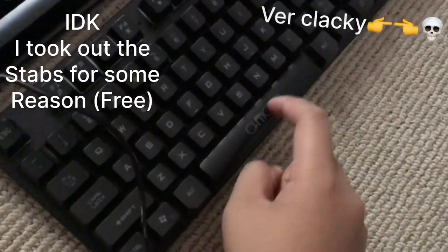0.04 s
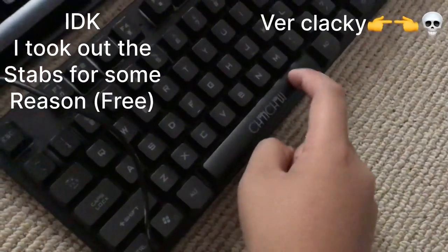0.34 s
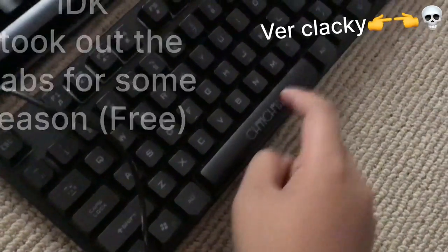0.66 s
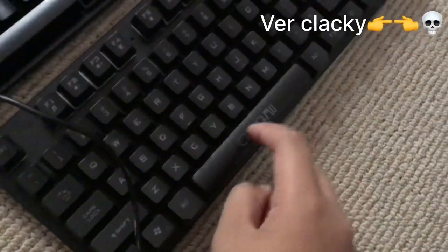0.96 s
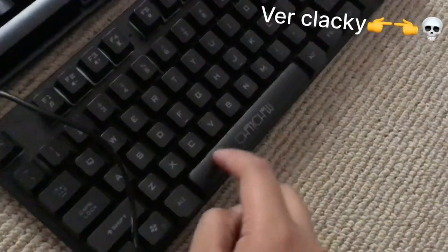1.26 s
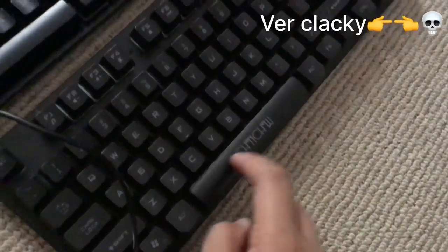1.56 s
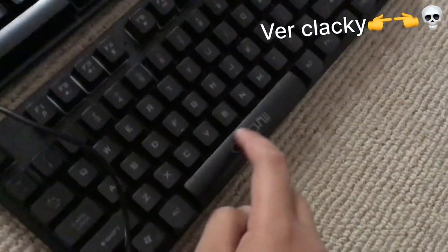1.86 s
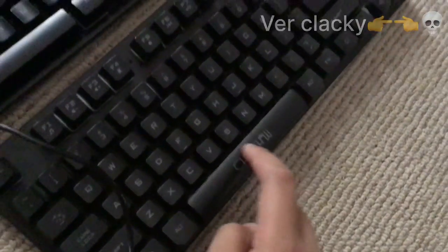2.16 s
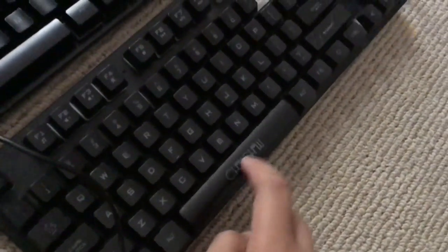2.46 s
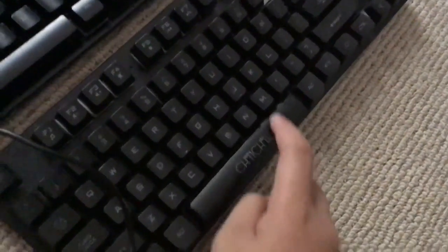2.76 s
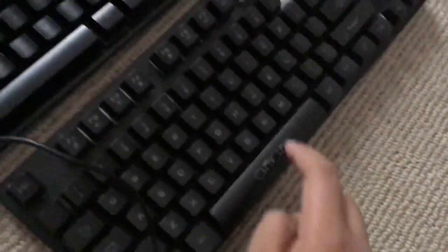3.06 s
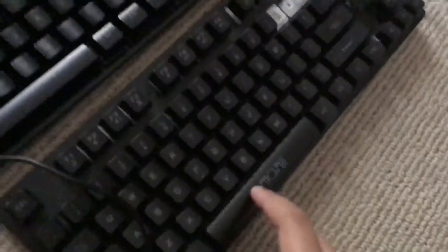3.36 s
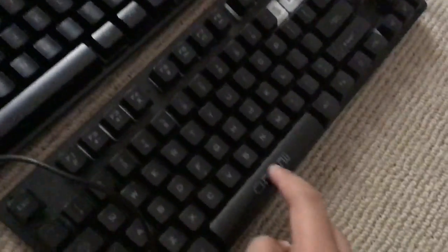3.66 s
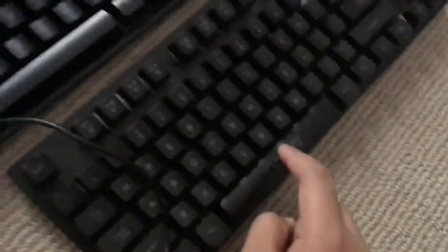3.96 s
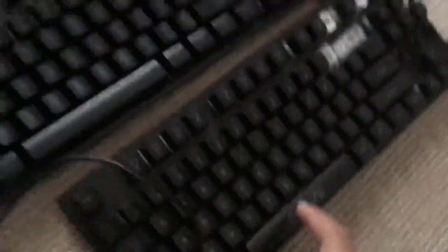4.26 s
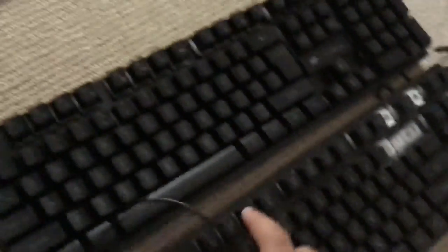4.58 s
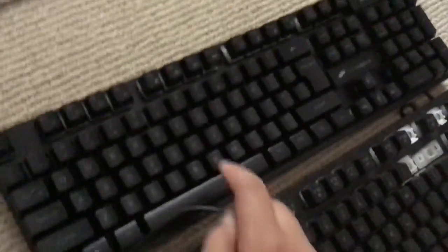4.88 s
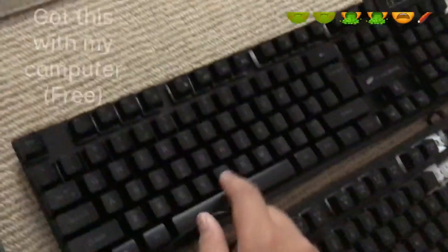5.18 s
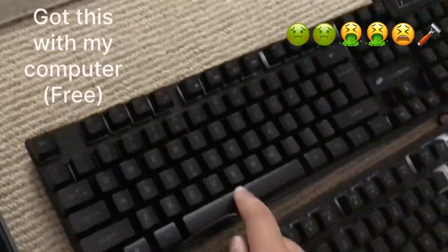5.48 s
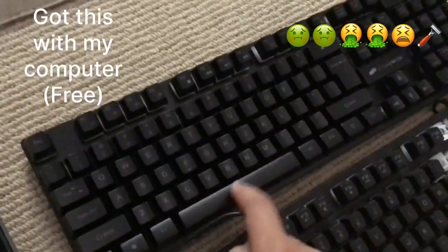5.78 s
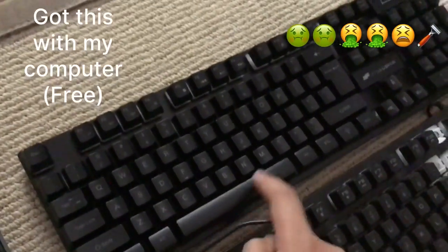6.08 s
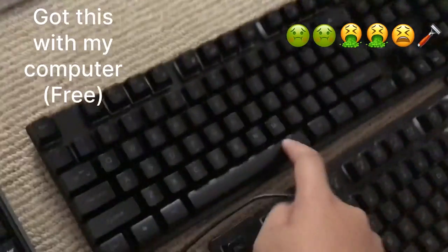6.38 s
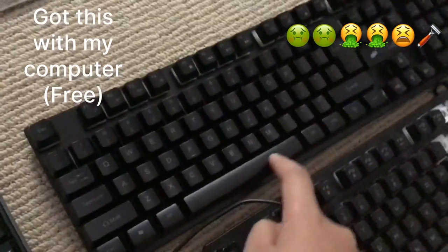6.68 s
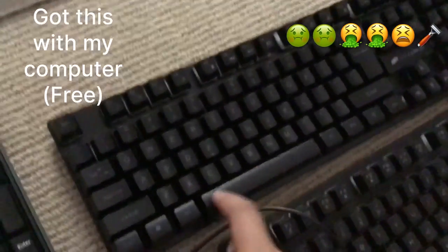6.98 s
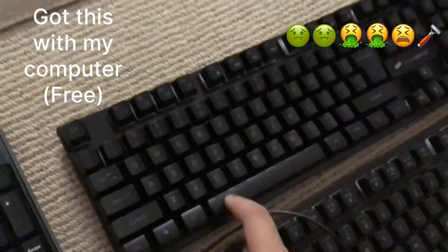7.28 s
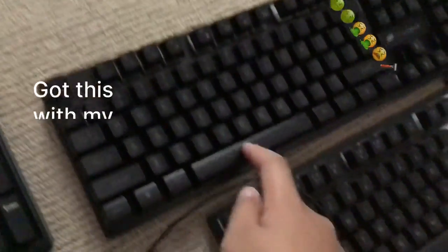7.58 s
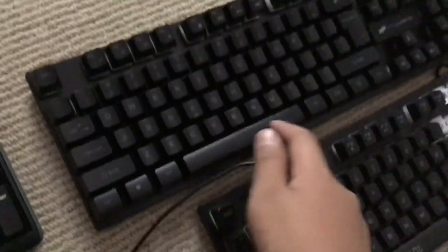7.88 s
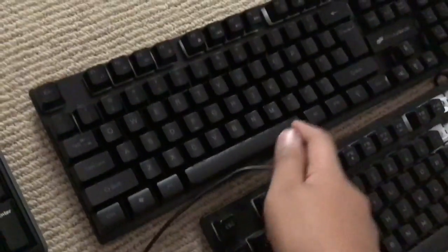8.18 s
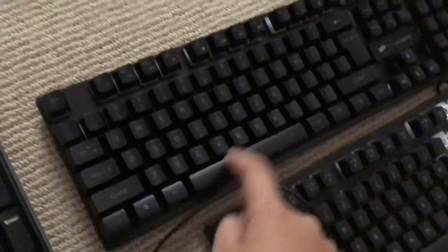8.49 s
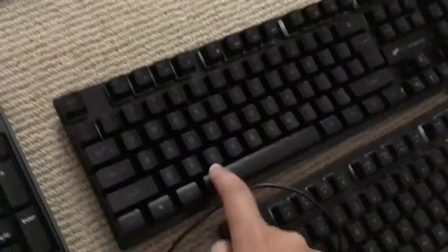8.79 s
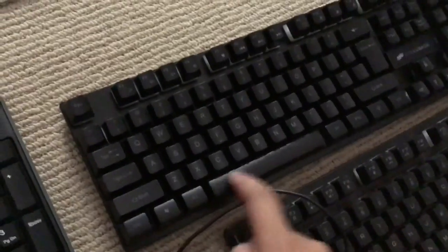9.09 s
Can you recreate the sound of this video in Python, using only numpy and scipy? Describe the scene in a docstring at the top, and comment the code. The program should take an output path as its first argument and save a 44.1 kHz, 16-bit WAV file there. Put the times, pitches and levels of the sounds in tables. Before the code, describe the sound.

From the start, one finger hammers the loose space bar of a plastic computer keyboard, about six presses a second in short, uneven runs. Each press lands with a small thud and snaps back with a hard, sharp clack, with light rattling between. The clacks are loudest around 3 to 3.5 seconds and stop just after 4 seconds. In the pause, a soft sleeve rustle and low handling rumble swell near 4.7 seconds, with a few faint key rattles. From about 5.5 seconds a second keyboard's space bar is tapped at a similar pace until just past 9 seconds. It sounds lighter, brighter and more rattly, with small ticks and, from around 7.3 seconds, a few tiny spring pings. The microphone is close, in a small room that adds a short ring to each hit, and a distant fan drones faintly underneath.

```python
"""Space bars on two keyboards.

One finger hammers the space bars of two plastic keyboards on a carpet, near a phone in a small room.
The first bar has no stabilisers: it bottoms out with a thud and snaps back with a hard clack.
A sleeve rustles over low handling rumble as the arm moves. The second bar is lighter and brighter, with
rattles, stem ticks and spring pings. Contacts ring the plastic and the room; a distant fan drones."""
import sys
import numpy as np
from scipy import signal
from scipy.fft import rfft, irfft, next_fast_len
from scipy.io import wavfile

SR = 44100
rng = np.random.default_rng(int(sys.argv[2]) if len(sys.argv) > 2 else 0)


def generate_wav(signal):
    """Clip the signal to [-1, 1] and save it as 16-bit WAV at the path in sys.argv[1]."""
    frames = np.transpose(np.atleast_2d(signal))
    scaled = np.clip(frames, -1, 1) * 32767
    pcm = np.round(scaled).astype(np.int16)
    wavfile.write(sys.argv[1], SR, pcm)


N = 407484
SECOND_FROM_S = 4.3
LEAD_IN_S = .012  # slide before each impact
BLOW_S = np.arange(SR // 12) / SR  # time axis of one blow
RMS_20MS = np.sqrt(SR / 50)  # unit energy to unit rms over 20 ms

# bar bottoms out: start_s, nominal_chatter_s, level_db, brightness_db
PRESSES = [(0.0918, 0.0197, -39.5, 1.5), (0.2634, 0.004, -45.5, -6), (0.7669, 0.011, -37, 1.5),
           (0.9272, 0.01, -38, 2.5), (1.0955, 0.0032, -43, -3), (1.2377, 0.01, -40.5, -0.5),
           (1.3947, 0.026, -37.5, 2), (1.5551, 0.012, -34, 4.5), (1.6002, 0.005, -49, -11.5),
           (1.8683, 0.0072, -39, 5), (2.0177, 0.01, -41, 0.5), (2.1589, 0.0018, -35, 0.5),
           (2.1699, 0.002, -42.5, 8), (2.4261, 0.0034, -37.5, 0.5), (2.5886, 0.0074, -35.5, 2),
           (2.8565, 0.0056, -34, 7), (2.8662, 0.0032, -36, -6.5), (3.0283, 0.0046, -34, 5.5),
           (3.3538, 0.008, -36, 0), (3.5075, 0.0061, -37.5, -1), (3.7678, 0.007, -36.5, 4),
           (4.0232, 0.0063, -33, 7), (5.7499, 0.0042, -37, -0.5), (5.9082, 0.006, -40, 3),
           (6.0442, 0.005, -40, 1.5), (6.34, 0.003, -33.5, -1.5), (6.4847, 0.004, -35.5, 10.5),
           (6.6511, 0.0025, -39.5, 2.5), (6.9503, 0.003, -33, -4), (7.1034, 0.0025, -37, -2.5),
           (7.246, 0.0026, -40, -2), (7.4076, 0.005, -40.5, -0.5), (7.5563, 0.0045, -40, 2),
           (7.72, 0.0034, -43.5, -0.5), (7.8725, 0.008, -40.5, 5), (8.1537, 0.013, -36.5, 4.5),
           (8.3073, 0.002, -36.5, 2), (8.6229, 0.0016, -38.5, -10.5), (8.7787, 0.0061, -36.5, 0),
           (8.957, 0.0042, -34.5, -3.5), (9.1117, 0.0027, -33.5, -1)]
# bar hits its top stop, brightest when one end leads: start_s, chatter_s, level_db, brightness_db
RELEASES = [(0.0136, 0.0011, -38, 9), (0.174, 0.00017, -28.5, 9), (0.7008, 0.00076, -30.5, 7.5),
            (0.829, 0.012, -43.5, -5.5), (1.0042, 0.0033, -39.5, -7.5), (1.1507, 0.0024, -30.5, 2),
            (1.3153, 0.00098, -28, 0), (1.4775, 0.00021, -29.5, -1.5), (1.7977, 0.0032, -37, 4.5),
            (1.9369, 0.00046, -39.5, -11.5), (2.087, 0.00066, -41.5, -14.5),
            (2.3443, 0.00017, -43.5, -15.5), (2.8007, 0.0008, -32, 12), (2.9355, 0.0006, -28, 6.5),
            (3.279, 0.0009, -26, 0), (3.4406, 0.00096, -25, -1), (3.707, 0.0014, -39, -5),
            (3.7167, 0.0015, -41, -6.5), (3.8338, 0.00117, -35.5, 6), (3.9611, 0.00024, -30.0, 10),
            (3.9763, 0.0032, -33, 0), (5.4564, 0.0022, -41, -11.5), (5.668, 0.0018, -40, -2),
            (5.6811, 0.0045, -42.5, -3), (5.8321, 0.0053, -36, -5), (5.955, 0.0036, -42, 11),
            (6.2785, 0.001, -42.5, 10), (6.3932, 0.00194, -36, 9.5), (6.41, 0.0059, -34.5, 0),
            (6.5332, 0.0014, -38.5, 9.5), (6.5515, 0.0046, -36, 5), (6.8548, 0.0014, -38, -9),
            (6.8665, 0.0019, -39.5, 1), (7.018, 0.005, -40, 2.5), (7.1592, 0.0028, -39, -3),
            (7.3615, 0.0024, -44.5, -13), (7.4655, 0.0045, -43, -10), (7.6338, 0.01, -45.5, -7),
            (7.7674, 0.011, -39.5, 5.5), (8.0777, 0.0065, -37, 9), (8.2048, 0.0024, -37.5, 6.5),
            (8.2229, 0.0007, -37.5, 3), (8.29, 0.0055, -36, -0.5), (8.5281, 0.0015, -40.5, -6),
            (8.637, 0.001, -38.5, -9.5), (8.7087, 0.00065, -43, -11.5), (9.017, 0.0053, -42.5, 1.5),
            (9.175, 0.008, -34, -3.5)]
# loose bar rocks in its guides: start_s, level_db
RATTLES = [(0.0437, -45.5), (0.2948, -58), (0.3915, -55), (0.407, -61.5), (0.5261, -55), (0.573, -56.5),
           (0.637, -55), (0.8524, -47.5), (0.8814, -46.5), (0.9056, -47), (1.1206, -47.5), (1.5276, -53.5),
           (1.679, -56), (1.7114, -58), (1.7721, -44), (1.856, -48), (1.926, -43.5), (2.0812, -48.5),
           (2.1387, -53.5), (2.333, -47), (2.3565, -49.5), (2.397, -51), (2.447, -45), (2.47, -47.5),
           (2.9166, -47.5), (3.2522, -47.5), (3.4075, -54.5), (3.5578, -50.5), (3.665, -54),
           (3.6888, -44.5), (3.741, -50), (3.7932, -49.5), (3.9418, -45), (4.5343, -57), (4.588, -57.5),
           (4.6505, -64), (4.7538, -53), (5.0554, -55.5), (5.195, -63.5), (5.31, -61.5), (5.4398, -55),
           (5.4762, -50.5), (5.543, -60), (5.582, -54), (5.818, -41), (5.9851, -46), (6.0133, -44),
           (6.1726, -47.5), (6.2172, -50), (6.2335, -51.5), (6.3181, -51.5), (6.4495, -46), (6.613, -50),
           (6.8415, -52.5), (6.9424, -42), (7.3195, -45.5), (7.351, -44.5), (7.4881, -44.5),
           (7.5464, -48.5), (7.6735, -43), (7.7106, -45.5), (7.9177, -54), (7.9573, -48), (8.049, -47),
           (8.1203, -46.5), (8.3567, -54.5), (8.4183, -59), (8.547, -45), (8.6114, -42), (8.681, -47.5),
           (8.7358, -44.5), (8.897, -46), (8.9333, -48.5), (9.0717, -42), (9.2039, -45.5)]
# fingertip knocks the bar softly as it lifts, just before the snap back: start_s, level_db
FINGER_LIFTS = [(0.662, -39), (2.7522, -30), (3.258, -27)]
# second bar's stem slips free: start_s, level_db
TICKS = [(5.818, -56), (5.9548, -57), (6.217, -62.5), (6.391, -51), (6.5332, -53), (7.351, -70),
         (7.7503, -60), (7.7677, -55.5), (8.049, -58), (8.2015, -51), (9.2039, -61)]
# second bar's spring unloads: start_s, level_db, pitch_hz
PINGS = [(7.353, -37, 5460), (7.668, -36, 5630), (8.732, -39, 6000), (8.9336, -46, 6420),
         (9.067, -37.5, 5800)]

# limits of the thud, knock, ring, clack, ping and tick bands: edge_hz
BAND_EDGES_HZ = [130, 480, 1100, 2000, 4100, 5600, 16000]
BANDS = [signal.butter(3, edges, "band", fs=SR, output="sos")
         for edges in zip(BAND_EDGES_HZ, BAND_EDGES_HZ[1:])]
# contact spectrum, row per keyboard: thud_db, knock_db, ring_db, clack_db, ping_db, tick_db
PRESS_BALANCE_DB = [(-5, -6, 0.0035, -7, -28.5, -17.5), (-15.5, -5.5, 0, -2, -20.5, -14.5)]
RELEASE_BALANCE_DB = [(-24, -12.5, .5, -3, -25, -16.5), (-22, -17.5, 0, -2.5, -20, -20.5)]
RATTLE_BALANCE_DB = [(-15, -5.5, 0, -5, -17.5, -21), (-21.5, -14.5, 0, -4.5, -18, -21.5)]
# brightness trades body for treble, row per keyboard, column per band: db_per_brightness_db
PRESS_TILT = [(-.5, 0, -0.17, 0.44, 0.15, .5), (0, 0.023, -0.42, 0.27, .4, .5)]
RELEASE_TILT = [(-.3, -0.29, -0.4, 0.11, .15, -0.12), (-0.072, -0.41, -0.36, 0.21, .45, 0.12)]

# bar, plate and case modes: pitch_hz, nominal_t60_s, level_db
FIRST_MODES = [(286, 0.073, -9), (301.6, 0.051, -6), (333.6, 0.06, -7), (336, 0.039, -13),
               (607, 0.03, -7.5), (737, 0.022, -6), (840, 0.016, -14), (1340, 0.025, -8.5),
               (1481, 0.039, -1.5), (1595, 0.031, 1), (2140, 0.0069, -8.5), (2468, 0.065, -12.5),
               (3160, .02, -3.5), (3300, 0.045, -11), (3690, 0.013, -4.5), (4623, 0.017, -11),
               (6020, 0.023, -13.5), (6930, 0.014, -14), (7960, 0.012, -13), (15500, 0.0091, -19)]
SECOND_MODES = [(247.5, 0.12, -18.5), (387, 0.045, -19), (562, 0.06, -17), (667, 0.021, -8),
                (740, .028, -13), (890, 0.019, -26.5), (1413, 0.038, -9.5), (1512, 0.031, -5.5),
                (1621, 0.034, -6.5), (1820, 0.014, -6), (2335, 0.0048, -2.5), (2486, 0.036, -8.5),
                (3252, 0.02, -4), (3554, 0.016, -5), (4680, 0.036, -20), (6240, 0.025, -17),
                (8280, 0.0086, -21.5), (10090, 0.03, -21), (11440, 0.015, -21), (11900, 0.014, -36),
                (15040, 0.0043, -8.5)]
# spectrum of the dense weak modes between them: freq_hz, level_db
FIRST_PLASTIC = [(100, -23.5), (300, -6), (480, -17), (700, -16.5), (1000, -3), (1500, -7), (2100, -1.5),
                 (3400, -3.5), (4200, -10.5), (5000, -2), (5800, -18), (8500, -19), (12500, -24.5),
                 (16000, -39.5)]
SECOND_PLASTIC = [(100, -15.5), (300, -8.5), (700, -1), (1000, -1), (1500, -17), (2100, 3.5), (3400, 3),
                  (4200, -10.5), (5000, -23.5), (5800, -10), (8500, -21), (16000, -27)]
# first bar's own modes, struck one end first: pitch_hz, t60_s, level_db
ASKEW_MODES = [(3103, 0.032, -13), (3312, 0.022, 1.5), (4530, 0.026, -.5), (4690, .016, -5)]

# diffuse room tail, row per band: t60_s, level_db
ROOM_TAILS = [(0.53, -2), (0.43, -6.5), (0.4, -4), (0.39, -4.5), (0.42, -11), (0.37, -6)]
# diffuse field spectrum: freq_hz, level_db
ROOM_COLOUR = [(130, -5), (290, 5.5), (460, -6), (660, 2.5), (1080, -3), (1560, 13.5), (1900, -7.5),
               (2800, -7), (3350, 0), (4100, -14.5), (4600, -4), (5600, -18), (8000, -19.5), (16000, -40)]
# standing waves between the walls: pitch_hz, t60_s, level_db
ROOM_MODES = [(135, 1, -16.5), (166, 0.94, -12), (238.5, 0.8, -9)]
# envelope of sleeve rustle and handling rumble: time_s, level_db
HANDLING_SWELL = [(4.3, -101), (4.45, -67), (4.6, -64), (4.71, -58.5), (4.78, -65), (4.95, -72.5),
                  (5.15, -75)]
# sleeve rustle with low rumble from handling the phone: freq_hz, level_db
HANDLING_COLOUR = [(40, -5), (75, 21), (150, 12), (480, 13.5), (900, 5.5), (3300, 2.5), (6500, -7),
                   (9000, -13), (12500, -25), (14500, -15), (16000, -32)]
# room air spectrum: freq_hz, level_db
AIR_COLOUR = [(15, -33), (25, -18.5), (70, 10.5), (195, -0.5), (242, -0.5), (293, -6.5), (427, -17.5),
              (607, -6.5), (775, -25), (1650, -14.5), (2350, -25.5), (3340, -21), (4250, -29), (14400, -40),
              (16000, -45)]


def strokes(events, balance_db, tilt, gain_db, chatter_scale, slides_db, hard_above_db=-35, hardening=.2):
    """The bar hits a stop; hard hits tick more. slides_db: stem scrape per keyboard."""
    out = np.zeros((len(BANDS), N))
    for start_s, chatter_s, level_db, brightness_db in events:
        board = keyboard_at(start_s)
        bands_db = level_db + np.array(balance_db[board]) + brightness_db * np.array(tilt[board])
        bands_db[-1] += hardening * max(level_db - hard_above_db, 0)
        strike(out, start_s, chatter_s * chatter_scale, slides_db[board], bands_db)
    return out * undb(gain_db)


def strike(track, start_s, chatter_s, slide_db, bands_db, impact_db=4, impact_lag_s=.0004,
           thud_lag_s=0.00414):
    """Mix in one blow, row per band. Less chatter: a cleaner impact, a purer and shorter ring."""
    clean = np.exp(-chatter_s / 0.0015)
    force = contact(chatter_s, slide_db)
    force[int((LEAD_IN_S + impact_lag_s) * SR)] += undb(impact_db) * clean
    boards = [(FIRST_MODES, FIRST_PLASTIC, -4.5), (SECOND_MODES, SECOND_PLASTIC, -1.0)]
    modes, plastic, dense_db = boards[keyboard_at(start_s)]
    ring = body(modes, plastic, damping=1 + 0.41 * clean, dense_db=dense_db - 7 * clean)
    sound = signal.fftconvolve(force, ring)[:len(BLOW_S)]
    parts = np.array([unit(signal.sosfilt(band, sound)) * undb(db) for band, db in zip(BANDS, bands_db)])
    # the heavy case sinks into the carpet just after the bar lands
    parts[0] = np.interp(BLOW_S - thud_lag_s, BLOW_S, parts[0], left=0)
    add(track, start_s - LEAD_IN_S, parts * RMS_20MS)


def contact(chatter_s, slide_db, grain_db=5, rise_s=0.00022, bounce_db=-12, bounce_s=0.017,
            loose_s=0.0029, slide_s=0.0074):
    """The stem scrapes, lands in uneven micro-impacts, and the loose bar bounces to rest."""
    size = len(BLOW_S)
    t = BLOW_S - LEAD_IN_S
    after_s = np.maximum(t, 0)
    grains = undb(grain_db * np.repeat(rng.standard_normal(size), SR // 4000)[:size])
    landing = unit(grains * rise(after_s, rise_s) * np.exp(-after_s / max(chatter_s, rise_s)))
    slide = unit(grains * (t < 0) * np.exp(np.minimum(t, 0) / slide_s))
    hops = np.repeat(rng.exponential(size=size), SR // 1000)[:size]
    bounces = unit(hops * (t > bounce_s / 2) * np.exp(-after_s / bounce_s))
    looseness = min(chatter_s / loose_s, 1)
    envelope = landing + undb(slide_db) * slide + undb(bounce_db) * looseness * bounces
    return rng.standard_normal(size) * envelope


def body(modes, plastic, damping, dense_db, dense_t60_s=0.018, spread_db=0.5, detune=0.0073):
    """The keyboard rings; finger position varies each mode's weight and pitch a little."""
    t = BLOW_S[:len(BLOW_S) // 2]
    pitch_hz, t60_s, level_db = np.transpose(modes)
    weight, shift, sign = rng.standard_normal((len(modes), 3)).T
    gains = np.sign(sign) * undb(level_db + spread_db * weight)
    detuned_hz = pitch_hz * (1 + detune * shift)
    rings = np.sin(2 * np.pi * np.outer(detuned_hz, t)) * decay(t, t60_s[:, None] / damping)
    dense = noise(plastic, len(t)) * decay(t, dense_t60_s)
    return unit(gains @ rings) + undb(dense_db) * unit(dense)


def askew_ring(gain_db=-3, db_per_brightness_db=1.5, rise_s=0.00045, detune=.008):
    """The more one end of the first bar leads on release, the harder its own modes ring."""
    out = np.zeros((len(BANDS), N))
    for start_s, _, level_db, brightness_db in RELEASES:
        if keyboard_at(start_s) == 0:
            for pitch_hz, t60_s, mode_db in ASKEW_MODES:
                envelope = rise(BLOW_S, rise_s) * decay(BLOW_S, t60_s)
                detuned_hz = pitch_hz * (1 + detune * rng.standard_normal())
                ring = envelope * np.sin(2 * np.pi * (detuned_hz * BLOW_S + rng.random()))
                gain = undb(level_db + mode_db + db_per_brightness_db * brightness_db)
                row = np.searchsorted(BAND_EDGES_HZ, pitch_hz) - 1
                add(out[row], start_s, gain * ring)
    return out * undb(gain_db)


def rattles(chatter_s=0.0038, slide_db=-20, firm_db=-46, dulling=.4):
    """Light contacts that hardly move the case; lighter ones tick less."""
    out = np.zeros((len(BANDS), N))
    for start_s, level_db in RATTLES:
        bands_db = level_db + np.array(RATTLE_BALANCE_DB[keyboard_at(start_s)])
        bands_db[-1] += dulling * (level_db - firm_db)
        strike(out, start_s, chatter_s, slide_db, bands_db)
    return out


def wobbles(count=3, gain_db=-18, spread_db=0.5, delay_range_s=(0.015, .09), chatter_s=0.0013,
            slide_db=-25):
    """The bar rocks in its guides after each press, in proportion to the blow."""
    out = np.zeros((len(BANDS), N))
    for press_s, _, press_db, _ in np.repeat(PRESSES, count, axis=0):
        level_db = press_db + gain_db + spread_db * rng.standard_normal()
        bands_db = level_db + np.array(RATTLE_BALANCE_DB[keyboard_at(press_s)])
        strike(out, press_s + rng.uniform(*delay_range_s), chatter_s, slide_db, bands_db)
    return out


def finger_lifts(pitch_hz=633, t60_s=0.06, rise_s=.004, chatter_s=0.0058, slide_db=-25,
                 contact_db=(-20, -25, -23, -21, -35, -31)):
    """The lifting fingertip softly knocks the hollow bar's lowest mode, with faint contact noise."""
    out = np.zeros((len(BANDS), N))
    knock = np.sin(2 * np.pi * pitch_hz * BLOW_S) * rise(BLOW_S, rise_s) * decay(BLOW_S, t60_s)
    for start_s, level_db in FINGER_LIFTS:
        strike(out, start_s, chatter_s, slide_db, level_db + np.array(contact_db))
        add(out[1], start_s, undb(level_db) * knock)
    return out


def stem_ticks(t60_s=0.022, rise_s=0.00044,
               colour=((4000, -20), (6000, -2), (8500, -3), (12000, -2), (15000, 0), (16000, -4))):
    """The stem catches and slips free: a short burst in the top band."""
    out = np.zeros((len(BANDS), N))
    envelope = rise(BLOW_S, rise_s) * decay(BLOW_S, t60_s)
    for start_s, level_db in TICKS:
        tick = signal.sosfilt(BANDS[-1], noise(colour, len(BLOW_S)) * envelope)
        add(out[-1], start_s, undb(level_db) * unit(tick) * RMS_20MS)
    return out


def spring_pings(gain_db=-3, t60_s=0.02, chatter_s=0.0014):
    """The coil slips on its seat and rings briefly."""
    out = np.zeros(N)
    for start_s, level_db, pitch_hz in PINGS:
        coil = np.sin(2 * np.pi * pitch_hz * BLOW_S) * decay(BLOW_S, t60_s)
        ping = signal.fftconvolve(contact(chatter_s, slide_db=-19), coil)
        add(out, start_s - LEAD_IN_S, undb(level_db + gain_db) * ping / np.abs(ping).max())
    return out


def room(sources, first_s=0.0024, build_s=0.00066, early_db=6, early_s=0.0086, wet_db=-2.0,
         clump_db=2, clump_s=0.0045):
    """Each band's power feeds a diffuse field: clumped reflections, tail longest in the bass."""
    t = np.arange(SR * 3 // 4) / SR
    arrival = rise(np.maximum(t - first_s, 0), build_s)
    wash = noise(ROOM_COLOUR, N)
    out = np.zeros(N)
    for source, band, (t60_s, level_db) in zip(sources, BANDS, ROOM_TAILS):
        fade = unit(arrival * (decay(t, t60_s) + undb(early_db) * np.exp(-t / early_s)))
        power = np.abs(signal.oaconvolve(source ** 2, fade ** 2)[:N])
        clumps = np.interp(np.arange(N) / SR / clump_s, np.arange(len(t)), rng.standard_normal(len(t)))
        field = signal.sosfilt(band, wash) * undb(clump_db * clumps)
        out += undb(level_db + wet_db) * np.sqrt(power) * field / np.std(field)
    return out


def standing_waves(thud):
    """Thuds leave the room's lowest modes humming."""
    hum = np.zeros(N)
    for pitch_hz, t60_s, level_db in ROOM_MODES:
        width_hz = np.log(1000) / (np.pi * t60_s)
        hum += undb(level_db) * unit(resonate(thud, pitch_hz, width_hz))
    return hum * np.linalg.norm(thud)


def handling(flutter_db=2, flutter_hz=30):
    """Sleeve rustle with low rumble from handling the phone; swells and fades unevenly."""
    t = np.arange(N) / SR
    flutter = np.interp(t * flutter_hz, np.arange(len(BLOW_S)), rng.standard_normal(len(BLOW_S)))
    swell_db = np.interp(t, *np.transpose(HANDLING_SWELL), left=-np.inf, right=-np.inf)
    return noise(HANDLING_COLOUR, N) * undb(swell_db + flutter_db * flutter)


def air_and_fan(air_db=-60, fan_hz=240, fan_width_hz=14, fan_db=-70):
    """Steady room air and a distant fan's narrow drone."""
    drone = resonate(rng.standard_normal(N), fan_hz, fan_width_hz)
    return undb(air_db) * noise(AIR_COLOUR, N) + undb(fan_db) * drone / np.std(drone)


def keyboard_at(time_s):
    """0: first keyboard, 1: second."""
    return int(time_s >= SECOND_FROM_S)


def undb(db):
    return 10 ** (np.asarray(db) / 20)


def unit(x):
    """Scale to unit energy."""
    return x / np.sqrt(np.sum(x ** 2) + 1e-30)


def rise(t, rise_s):
    return 1 - np.exp(-t / rise_s)


def decay(t, t60_s):
    return np.exp(-np.log(1000) * t / t60_s)


def resonate(x, pitch_hz, width_hz):
    return signal.lfilter(*signal.iirpeak(pitch_hz, pitch_hz / width_hz, fs=SR), x)


def noise(colour, size):
    """Unit-rms noise shaped by (freq_hz, level_db) points."""
    length = next_fast_len(size)
    freq_hz, level_db = np.transpose(colour)
    bins_hz = np.fft.rfftfreq(length, 1 / SR)
    gain = undb(np.interp(np.log(bins_hz + 1), np.log(freq_hz), level_db))
    x = irfft(rfft(rng.standard_normal(length)) * gain, length)[:size]
    return x / np.std(x)


def add(track, start_s, x):
    start = min(max(int(start_s * SR), 0), N)
    part = x[..., :N - start]
    track[..., start:start + part.shape[-1]] += part


def scene(release_room_db=-0.5):
    """Space bars, room and background, mono."""
    presses = strokes(PRESSES, PRESS_BALANCE_DB, PRESS_TILT,
                      gain_db=0.5, chatter_scale=0.91, slides_db=(-22, -17))
    releases = askew_ring() + strokes(RELEASES, RELEASE_BALANCE_DB, RELEASE_TILT,
                                      gain_db=-1, chatter_scale=1.0, slides_db=(-28.5, -16))
    light_contacts = rattles() + wobbles() + finger_lifts() + stem_ticks()
    bands = presses + releases + light_contacts
    # alternate signs keep adjacent bands from cancelling at their edges
    direct = bands[::2].sum(axis=0) - bands[1::2].sum(axis=0)
    # the freed bar radiates straight up at the phone, so its snap is drier
    diffuse = room(presses + light_contacts + undb(release_room_db) * releases)
    hum = standing_waves(bands[0])
    return (direct + spring_pings() + diffuse + hum + air_and_fan() + handling())[None]


def record(dry, low_cut_hz=45, high_cut_hz=16200):
    """The phone cuts the deepest bass and the very top."""
    highpass = signal.butter(2, low_cut_hz, "high", fs=SR, output="sos")
    lowpass = signal.ellip(10, .2, 80, high_cut_hz, fs=SR, output="sos")
    return signal.sosfilt(lowpass, signal.sosfilt(highpass, dry))


dry = scene()
out = record(dry)
generate_wav(out)
```